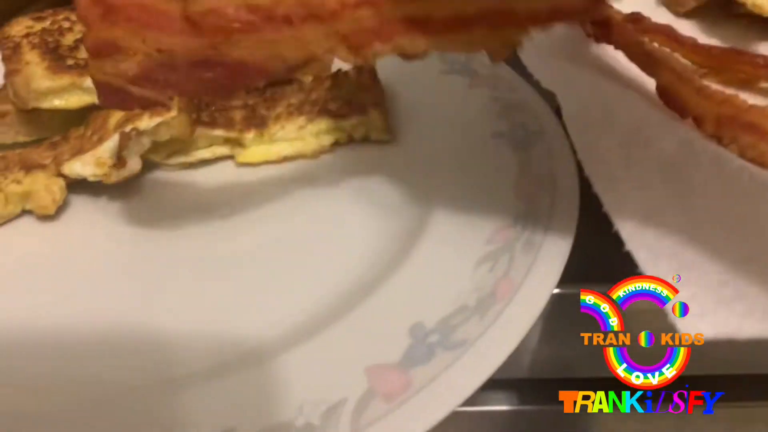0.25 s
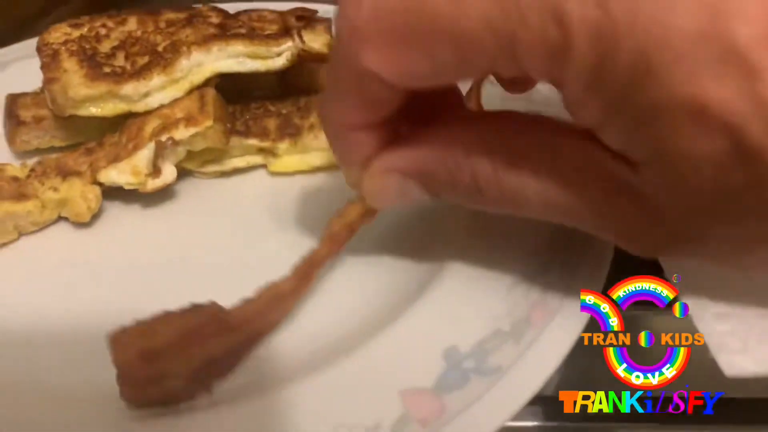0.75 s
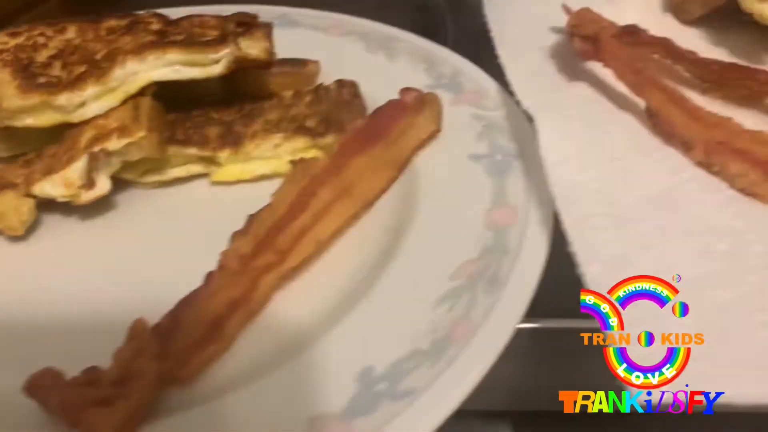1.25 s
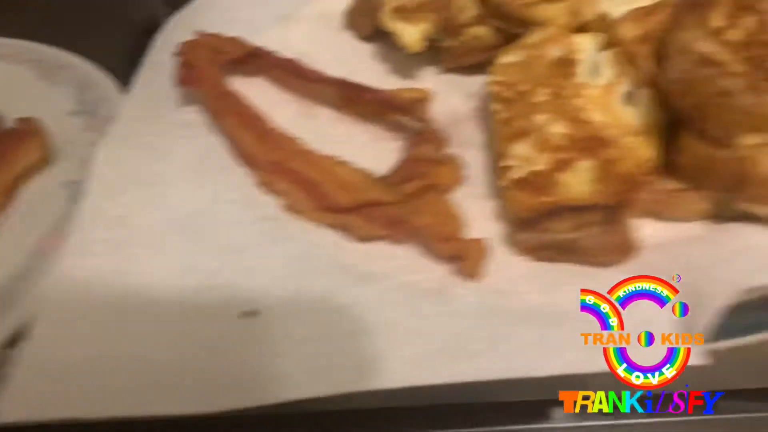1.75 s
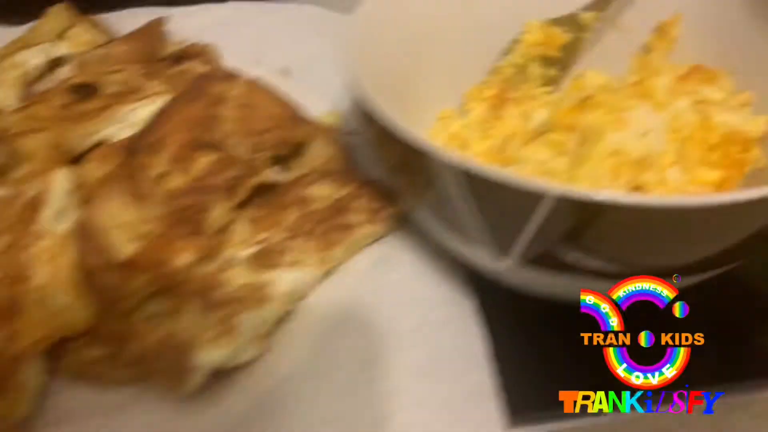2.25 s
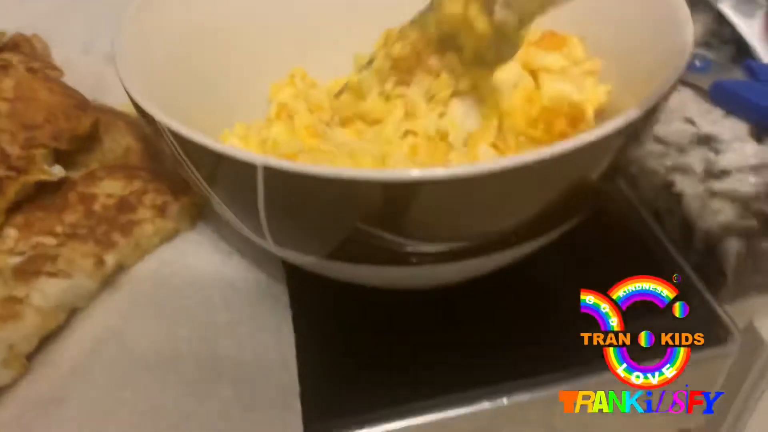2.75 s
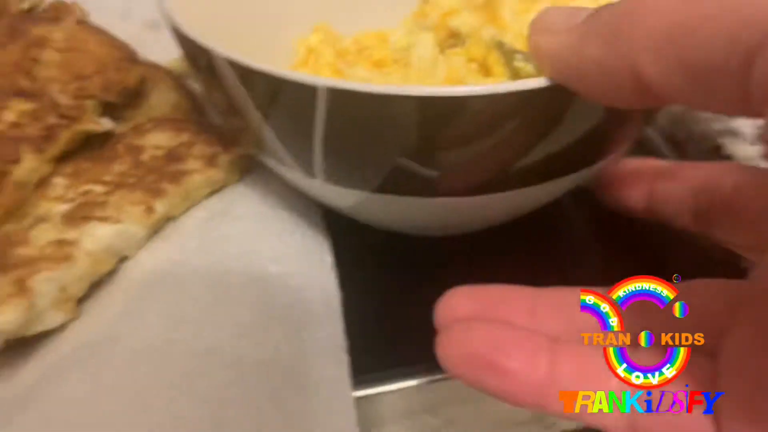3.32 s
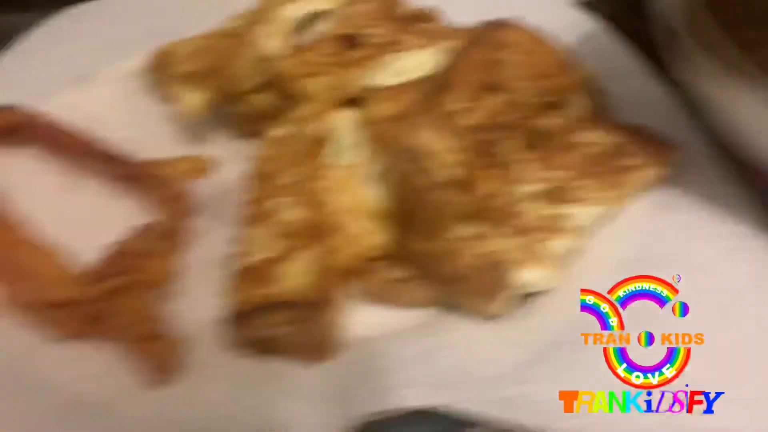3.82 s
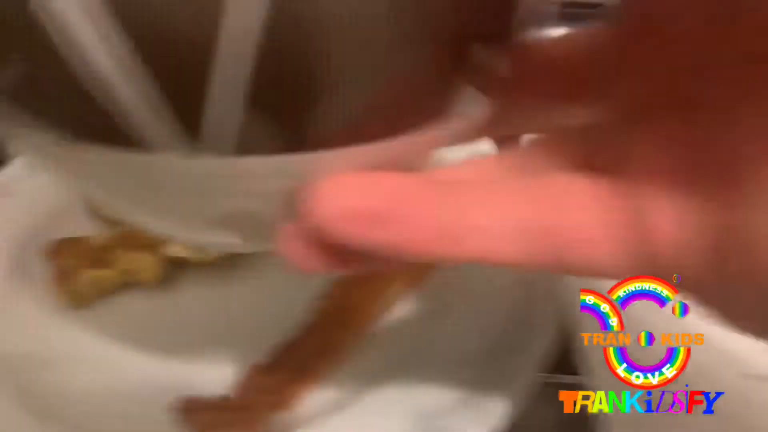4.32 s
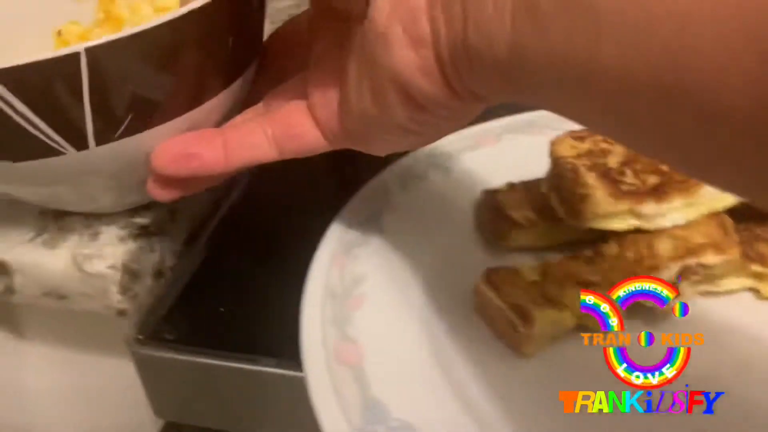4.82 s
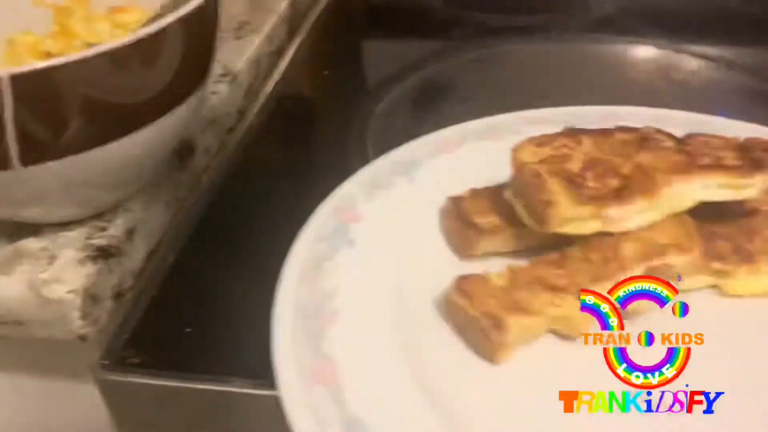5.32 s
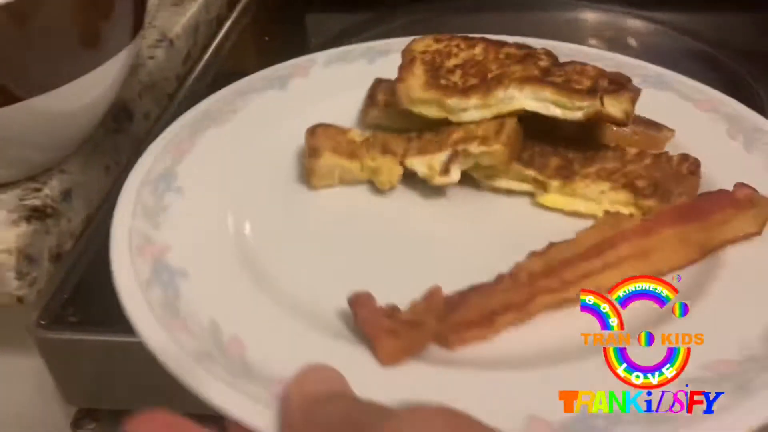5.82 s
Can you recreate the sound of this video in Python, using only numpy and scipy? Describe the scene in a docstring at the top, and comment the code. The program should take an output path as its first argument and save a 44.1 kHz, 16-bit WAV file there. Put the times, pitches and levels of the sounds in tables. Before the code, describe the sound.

Food is plated in a small home kitchen, heard from close by over a faint appliance hum. Small crisp snaps and soft taps come first, then a few bright clinks of a spoon in a ceramic bowl, with quiet rustles between them. Near the end the bowl lands on a stone counter with a booming double knock, and a plate knocks and scrapes briefly across the stove top.

```python
"""A small kitchen, close up, as food is plated. Crisp food snaps, rustles and ticks on a plate, and a
spoon clinks in a ceramic bowl, ringing its modes. The bowl is set down on a stone counter, which booms;
then the plate is dragged over the stove top, grit scraping under its foot. An appliance hums over the
low murmur of the room, and the walls answer each blow."""
import sys
import numpy as np
from scipy import signal
from scipy.fft import rfft, irfft, next_fast_len
from scipy.io import wavfile
from scipy.ndimage import uniform_filter1d, map_coordinates

SR = 44100
rng = np.random.default_rng(int(sys.argv[2]) if len(sys.argv) > 2 else 0)


def dump(signal):
    """Clip the signal to [-1, 1] and save it as 16-bit WAV at the path in sys.argv[1]."""
    limited = np.clip(np.atleast_2d(signal).T, -1, 1)
    pcm = np.round(limited * 32767).astype(np.int16)
    wavfile.write(sys.argv[1], SR, pcm)


N = 267687

# the drag of the plate: t/s, scrape/dB, hiss/dB
DRAG_LEVELS = [(5.43, -85, -87), (5.486, -47.5, -52), (5.52, -33, -33), (5.6, -36.5, -42),
               (5.675, -36.5, -39), (5.724, -26, -35), (5.83, -26.5, -37.5), (5.88, -27, -35),
               (5.95, -43, -42.5), (6.07, -45, -60)]
# spectrum of the grit under its foot: f/Hz, level/dB
GRIT_SPECTRUM = [(47, -51), (80, -58), (289, 8), (1630, -9.5), (1860, -0.5), (2080, -6), (4420, -8),
                 (4940, -19), (13700, -40.5), (14600, -50), (16000, -99.5)]


def amp(db):
    return 10 ** (np.asarray(db) / 20)


def unit(x):
    return x / np.sqrt(np.mean(x ** 2) + 1e-20)


def along(points, hz):
    """Read (f/Hz, value) points on a log frequency axis."""
    f, v = np.transpose(points)
    return np.interp(np.log(hz + 1), np.log(f + 1), v)


def faders(rows):
    """A dB curve for each column after the time; silent before the first row."""
    times, *columns = np.vstack(rows).T
    return [np.interp(np.arange(N) / SR, times, db, left=-150) for db in columns]


def wobble(rate):
    """A smooth random curve, rate knots a second."""
    return map_coordinates(rng.standard_normal(int(N * rate / SR) + 4), [np.arange(N) * rate / SR])


def filtered(x, response):
    """Shape x by a complex function of frequency."""
    size = next_fast_len(x.shape[-1] + 8192)
    return irfft(rfft(x, size) * response(np.fft.rfftfreq(size, 1 / SR)), size)[..., :x.shape[-1]]


def add(out, s, sound, pan_db=0):
    """Mix a sound in at s seconds; positive pan is left."""
    part = out[:, round(s * SR):][:, :len(sound)]
    part += sound[:part.shape[1]] * amp([[pan_db / 2], [-pan_db / 2]])


def ring(modes, damping, hold_s=0):
    """Struck modes, each at a new strength; further contact slows their decay for hold_s."""
    t = np.arange(SR // 4) / SR
    hz, db, t60 = np.transpose(modes)[:, :, None]
    age = t - .45 * np.minimum(t, hold_s)
    level = db + 1.5 * rng.standard_normal(db.shape) - 60 * damping * age / t60
    window = (1 - np.exp(-t / 0.00072)) * np.cos(2 * np.pi * t) ** .5
    return (amp(level) * np.sin(2 * np.pi * hz * t)).sum(0) * window


def grainy(rate, spread_db, share, patchy_db, size=N):
    """Stereo noise with spikes on it, in patches of random gain."""
    spikes = (rng.random(size) < rate / SR) * rng.standard_normal(size)
    spikes *= amp(spread_db * rng.exponential(size=size))
    grains = np.sqrt(share) * unit(spikes) + np.sqrt(1 - share) * rng.standard_normal((2, size))
    spectra = signal.stft(grains, nperseg=256)[2]
    patches = uniform_filter1d(rng.standard_normal(spectra.shape[1:]), size=7, axis=0)
    patches = uniform_filter1d(patches, size=9, axis=1)
    return signal.istft(spectra * amp(patchy_db * unit(patches)), nperseg=256)[1][:, :size]


def room_air():
    """Stereo noise bed, heavy in the bass, whose width changes with pitch."""
    # spectrum of the room: f/Hz, level/dB
    spectrum = [(12, -65.5), (20, -35.5), (43, -6), (65, -4.5), (77, -20.5), (91, -37), (124, -24),
                (151, -28), (230, -22.5), (273, -27.5), (314, -23), (351, -29), (913, -40.5), (1180, -56.5),
                (16500, -57)]
    # how alike left and right are: f/Hz, correlation
    likeness = [(60, 0.33), (130, 0.9), (290, 0.47), (640, -0.18), (1410, 0.52), (3100, -0.18),
                (6820, -0.64), (15000, 0.9)]
    angle = lambda hz: np.arccos(along(likeness, hz)) / 2
    noise = rng.standard_normal((2, N))
    mid, side = filtered(noise, lambda hz: np.array([np.cos(angle(hz)), np.sin(angle(hz))]))
    return filtered(np.array([mid + side, mid - side]), lambda hz: amp(along(spectrum, hz)))


def hum_and_murmur():
    """An appliance hum wavers near mains pitch over the room's murmur and faint hiss."""
    # background levels: t/s, hum/dB, murmur/dB
    bed_levels = [(0.0, -61, -73.5), (0.93, -61, -67), (1.55, -60, -73), (2.1, -58.5, -58), (2.5, -60, -65),
                  (3.2, -61, -58), (3.7, -62.5, -64.5), (4.55, -59, -63), (5.1, -56.5, -64),
                  (6.07, -52.5, -68.5)]
    hum_db, murmur_db = faders(bed_levels)
    air = room_air()
    bass = lambda hz: 1 / (1 + (hz / 85) ** 8)
    rumble = unit(filtered(air, bass))
    murmur = unit(filtered(air, lambda hz: (1 - bass(hz)) * (hz < 1200)))
    hiss = unit(filtered(air, lambda hz: (hz >= 1200) * (hz < 15200)))
    mains = np.sin(2 * np.pi * np.cumsum(59 + 0.88 * wobble(2.5)) / SR)
    shake = amp(faders(DRAG_LEVELS)[0] - 12)  # the dragged plate shakes the stove top
    murmur *= (amp(murmur_db) + shake) * amp(0.51 * wobble(6.5))
    return amp(hum_db) * (0.64 * rumble + 0.78 * mains) + murmur + amp(-84.5) * hiss


def walls(x):
    """The room's short answer; the treble dies first."""
    # reverb decay: f/Hz, t60/s
    decay = [(100, .5), (500, .4), (2000, .33), (6000, .2), (14000, .12)]
    hz, t, spectra = signal.stft(rng.standard_normal((2, SR // 2)), SR, nperseg=256)
    tail = signal.istft(spectra * amp(-60 * t / along(decay, hz)[:, None]), SR, nperseg=256)[1]
    delayed = np.pad(x, (130, 0))[None]
    return signal.fftconvolve(delayed, tail / np.linalg.norm(tail[0]), axes=1)[:, :N]


def rustle():
    """Dull and bright rustle of handling, swelling into the noisy tails of the loud clinks and knocks."""
    # rustle and tails of the hits: t/s, dull/dB, bright/dB
    levels = [(0.5, -95, -88), (0.63, -107, -89.5), (0.7, -88, -67), (0.76, -75, -80), (0.89, -77.5, -70.5),
              (0.97, -84, -80.5), (1.05, -77, -66), (1.15, -71, -87), (1.3, -105, -99), (1.66, -81.5, -104),
              (1.75, -49.5, -44), (1.91, -69.5, -75.5), (2.12, -65.5, -76), (2.24, -62.5, -69.5),
              (2.36, -65, -60.5), (2.5, -79, -82.5), (2.63, -80, -80.5), (2.76, -59.5, -58.5),
              (3.08, -66.5, -71), (3.3, -68, -79), (3.68, -71.5, -81.5), (3.75, -70, -69), (3.93, -74, -73),
              (4.0, -75.5, -79), (4.5, -71, -77), (4.7, -62, -57.5), (4.95, -54.5, -68), (5.1, -68.5, -67),
              (5.45, -83, -85)]
    # colours of the two textures: f/Hz, level/dB
    dull_eq = [(400, -30), (900, -1.5), (2000, 0), (4000, -5), (7000, -23.5), (16000, -47.5)]
    bright_eq = [(2500, -44.5), (5000, -5), (8000, -4), (12000, -6), (15500, -11.5), (17000, -31.5)]
    dull_db, bright_db = faders(levels)
    dull = grainy(330, spread_db=-0.5, share=0.095, patchy_db=3.5)
    dull = unit(filtered(dull, lambda hz: amp(along(dull_eq, hz))))
    bright = grainy(770, spread_db=1.0, share=0.075, patchy_db=3.0)
    bright = unit(filtered(bright, lambda hz: amp(along(bright_eq, hz))))
    return amp(dull_db + 2.2 * wobble(15)) * dull + amp(bright_db + 3.0 * wobble(29)) * bright


def food_snaps():
    """Crisp crust and wet egg snap: a few pitched cycles on a broad tick."""
    # snaps: t/s, level/dB, f/Hz
    snaps = [(0.5387, -33, 8700), (0.5618, -45, 3130), (0.599, -52, 8340), (0.6814, -50, 13100),
             (0.7786, -54, 11900), (0.8129, -43, 12600), (0.8902, -52, 9400), (0.9074, -56, 4400),
             (1.0224, -54, 9600), (1.046, -44, 13200), (1.0572, -49.5, 4770), (1.0833, -45.5, 9900),
             (1.1513, -53.5, 10100), (2.1729, -47.5, 3830), (2.2146, -43.5, 7750), (2.3236, -40.5, 12300),
             (2.338, -35, 10800), (2.3494, -40, 11400), (2.3672, -43, 2980), (2.3853, -30, 9200),
             (2.396, -42, 10300), (2.6694, -56, 3420), (2.7157, -38.5, 12400), (2.7382, -36, 7700),
             (2.7628, -37.5, 9900), (2.7702, -32.5, 7600), (2.7754, -35, 8600), (2.855, -47, 10060),
             (2.894, -35, 14400), (2.9378, -48, 3900), (2.9643, -47.5, 9920), (3.03, -45, 7580),
             (3.0579, -41, 3670), (3.2879, -44.5, 5007)]
    rise_cycles, decay_cycles = .5, 5.1
    out, t = np.zeros((2, N)), np.arange(400) / SR
    for s, db, hz in snaps:
        envelope = np.exp(-t * hz / decay_cycles) * (1 - np.exp(-t * hz / rise_cycles))
        pip = np.sin(2 * np.pi * hz * t) * envelope
        tick = .2 * hz / 10000 * np.diff(rng.standard_normal(401)) * np.exp(-t / 0.0043)
        add(out, s, amp(db) * (pip + tick), pan_db=7.5 + 7 * rng.standard_normal())
    return out


def plate_colour(f):
    """The plate's resonances on a flat bed, each weighed against the grit's spectrum."""
    # plate modes: f/Hz, width/Hz, level/dB
    plate_modes = [(283, 120, 1), (873, 170, 6), (1310, 250, -6.5), (1832, 98, 4), (2370, 10.7, -33),
                   (2510, 33, -1), (2782, 33, -2.5), (3165, 50, 1.5), (3930, 17, -10), (4390, 200, -3.5),
                   (4480, 130, -9.5), (5230, 26, -9.5), (6500, 26, -13.5), (7980, 46, -14.5),
                   (8270, 31, -13), (9130, 29, -21.5), (9920, 47, -16), (11020, 62, -23),
                   (11900, 40.7, -21), (13630, 82, -23), (14150, 23, -29.5), (14500, 28, -34)]
    peaks = 0
    for k, (hz, width, db) in enumerate(plate_modes):
        resonance = 1j * f * width / (hz * hz - f * f + 1j * f * width)
        peaks += (-1) ** k * amp(db - along(GRIT_SPECTRUM, hz)) * resonance
    return .55 + 1.3 * peaks


def plate_taps():
    """Food lands on the plate and rings its free rim."""
    # landings: t/s, level/dB, damping factor
    landings = [(0.5402, -54, 1.96), (0.8114, -79.5, 0.32), (1.048, -53, 1.38), (1.1514, -63.5, 2.1)]
    # rim modes: f/Hz, level/dB, t60/s at damping 1
    rim_modes = [(1237, 1.5, 0.2), (1959, -8, 0.58), (2066, -0.5, 0.43), (2895, -4, 0.47),
                 (3570, -11, 0.23), (4270, -21.5, 0.8), (6260, -13, 0.14)]
    out = np.zeros((2, N))
    for s, db, damping in landings:
        add(out, s, amp(db) * ring(rim_modes, damping))
    return out


def plate_drag():
    """Grit under the dragged foot shakes the plate's modes: rumble, scrape and hiss."""
    grit = grainy(600, spread_db=2, share=0.3, patchy_db=1.5, size=SR)
    grit = filtered(grit, lambda hz: amp(along(GRIT_SPECTRUM, hz)) * plate_colour(hz))
    out = np.zeros((2, N))
    scrape_db, hiss_db = faders(DRAG_LEVELS)
    rumble_db = scrape_db - 0.5
    for k, db in enumerate([rumble_db, scrape_db, hiss_db]):
        crossover = [(700, k == 0), (1900, k == 1), (4300, k == 1), (6500, k == 2)]
        band = filtered(grit, lambda hz: along(crossover, hz))
        out[:, -SR:] += amp(db + 1.2 * wobble(70))[-SR:] * unit(band)  # the foot catches and slips
    return out


def spoon_clinks():
    """A spoon strikes the bowl, cracks and chatters; where it lands tilts the strength of the modes."""
    # clinks: t/s, level/dB, tilt/dB near 1, 2.8, 7.7 and 11 kHz, damping factor, pan/dB
    clinks = [(1.5801, -47, -14.5, -18, -5.5, -34, 1.2, 8.2),
              (1.7255, -14.5, -27.5, -20, -27, -7.5, 1.4, 11),
              (1.8612, -45.5, -6.5, -8.5, -8, -9, 0.7, 7.5), (1.8914, -49.5, -16, -10, -2.5, -6.5, 3.1, 23),
              (1.9871, -53, -4, 2.5, -8.5, -7.5, 0.87, 11.7), (2.0176, -52.5, -4, -11, -13, -24, 1.5, 9.6),
              (3.1264, -17.5, -25, -12.5, -6.5, -5.5, 1.03, 13),
              (3.23, -55.5, -13, 2.5, -11, -6, 0.98, 15.5), (3.6298, -84, 17.5, 13, -13, -6, 0.95, 14),
              (3.71, -43, -7.5, 11.5, -3, -12.5, 4.1, 11.6), (4.1386, -70, -1, -3, -11, -14, 1.4, 5.3),
              (4.1636, -68.5, 5, -0.5, -11, -20, 3.4, 14), (4.2613, -49, -9, 12.5, -7, -16.5, 2.4, 2),
              (4.6339, -52.5, -6, 9.5, -7, -29, 2, 7.1), (4.7315, -24.5, -13, -0.5, -17.5, -18.5, 1.7, 5.9),
              (4.936, -16.5, -15.5, -3, -10.5, -9, 4.7, 11.5), (5.0444, -52.5, -14, 3, -19, -10.5, 2, 10)]
    # ceramic modes: f/Hz, level/dB, t60/s at damping 1
    bowl_modes = [(1062, -3, .3), (1092, -3, .3), (1850, -6, .05), (2775, -15, .25), (2860, 0, .075),
                  (3390, -11, .08), (4996, -19, .3), (5034, -15, .35), (5044, 0, .07), (7715, 0, .1),
                  (9450, -26, .08), (10815, 0, .12), (11390, -15, .2), (12115, -17, .17), (13180, -21, .12),
                  (14245, 0, .09), (15500, -11, .06)]
    chatter_s, crack_t60, crack_hz = .018, .018, 7100
    out, t = np.zeros((2, N)), np.arange(3000) / SR
    hz, db, t60 = np.transpose(bowl_modes)
    for s, level_db, low, mid, high, top, damping, pan_db in clinks:
        tilt = [(1075, low), (2800, mid), (5040, 0.0089), (7715, high), (11000, top), (14245, top - 11.5)]
        contact = .034 * rng.standard_normal(len(t)) * np.exp(-(t / chatter_s) ** 4)
        contact[0] = 1  # the blow itself, ahead of the chatter
        ceramic = ring(np.transpose([hz, db + along(tilt, hz), t60]), damping, chatter_s)
        add(out, s, amp(level_db) * signal.fftconvolve(ceramic, contact), pan_db)
        crack = filtered(rng.standard_normal(len(t)), lambda f: 1 / (1 + (crack_hz / (f + 1)) ** 8))
        add(out, s, amp(level_db + top + 2 - 60 * t / crack_t60) * crack, pan_db)
    return out


def slab_sweep(t):
    """A blow on the stone slab arrives as a falling sweep: pitch = cycles / age."""
    cycles, length_s = 4, 0.015
    age = t + 1 / 2000
    envelope = np.sqrt(length_s / age) * np.exp(-(age / length_s) ** 2)
    return np.sin(2 * np.pi * cycles * np.log(age)) * envelope


def dish_knocks():
    """Dishes knock on hard tops in noise bursts that die band by band; returns counter and plate."""
    # knocks: t/s, level/dB, strongest f/Hz, fall below and above it/(dB per octave), counter boom/dB
    blows = [(0.538, -55.5, 1500, 6.5, 2.6, -79), (0.565, -65, 1200, 2, 2.5, -75),
             (0.599, -68, 2000, 4, 4.3, -75), (1.045, -52, 896, 10.5, 6.4, -73),
             (1.462, -58.5, 171, 8.5, 14.4, -53.5), (1.577, -70, 1780, 3.5, 4.6, -61.5),
             (1.725, -37.5, 480, 3.5, 0.55, -60.5), (1.739, -43.5, 404, 1, 4.5, -48.5),
             (1.889, -62.5, 2800, 4, 7.1, -57.5), (1.99, -60, 2190, 8, 13, -58),
             (3.127, -33, 2500, 1, 4.5, -50.5), (3.386, -57, 170, 6, 20, -51.5),
             (3.709, -58.5, 1910, 17, 7, -57), (3.931, -62.5, 170, 5, 8, -48.5),
             (4.261, -64, 1900, 6, 9, -65.5), (4.631, -66.5, 4000, 2, 6, -50),
             (4.7004, -13, 864, 9, 7.9, -29), (4.925, -22.5, 1210, 8.5, 8.5, -39.5),
             (4.939, -32, 450, 16, 4, -45.5), (5.48, -41.5, 1090, 7, 5.5, -49.5),
             (5.516, -15.5, 840, 10.5, 6.85, -61), (5.902, -19, 4067, 3, 5.3, -61)]
    # bands of the contact noise: f/Hz, t60/s
    band_decay = [(170, 0.17), (450, 0.096), (1300, 0.084), (3000, 0.15), (6500, 0.017), (12500, 0.086)]
    # counter modes, before each knock's offsets: f/Hz, level/dB, t60/s
    counter_modes = [(94, -2.5, 0.45), (584, 3, 0.096)]
    contact_s, crack_db, crack_cycles = 0.0046, 7, 3.7
    lag_cycles = 1.6  # each band trails the touch: bending waves carry the treble faster
    counter, plate, t = np.zeros((2, N)), np.zeros((2, N)), np.arange(SR // 5) / SR
    centres, t60s = np.transpose(band_decay)[:, :, None]
    crossovers = [np.transpose([centres[:, 0], row]) for row in np.eye(len(centres))]
    split = lambda hz: np.array([along(points, hz) for points in crossovers]) * (hz > 105)
    onset = t < contact_s + 1 / centres
    cycles = np.maximum(t * centres - lag_cycles, 0)
    decay_db = -60 * np.maximum(t - contact_s - lag_cycles / centres, 0) / t60s
    envelope = np.minimum(cycles, 1) * amp(decay_db + crack_db * np.exp(-(cycles / crack_cycles) ** 2))
    for s, db, peak_hz, below_db, above_db, boom_db in blows:
        octaves = np.log2(centres / peak_hz)
        band_db = db - np.where(octaves > 0, above_db, -below_db) * octaves
        burst, out = rng.standard_normal(len(t)), counter
        if 4.69 < s < 4.93:  # the bowl's foot meets the slab
            burst += 0.47 * slab_sweep(t)
        if not 1.3 < s < 5.4:  # before and after the bowl is handled, the plate takes the knock
            burst, out = filtered(burst, plate_colour), plate
        bands = filtered(burst, split)
        bands /= np.sqrt((bands ** 2 * onset).sum(1) / onset.sum(1))[:, None]
        add(out, s, (bands * amp(band_db) * envelope).sum(0))
        offsets = [[0, boom_db, 0], [0, band_db[1, 0] + 4, 0.0029]]  # upper mode follows the 450 Hz band
        add(counter, s, ring(np.add(counter_modes, offsets), damping=1))
    return counter, plate


def scene():
    """Dishes and food reach the left channel later, except in the top treble; the room surrounds them."""
    counter, plate_knocks = dish_knocks()
    close = spoon_clinks() + plate_knocks + plate_drag() + plate_taps() + food_snaps() + rustle()
    lag_s, sides = 0.0004657, np.array([[1], [-1]])
    placed = filtered(close, lambda hz: np.exp(-1j * np.pi * np.minimum(hz * lag_s, 4) * sides))
    return placed + counter + amp(-13.5) * walls((close + counter).mean(0)) + hum_and_murmur()


def record(dry):
    """The microphones narrow the image in the bass and high treble and cut off the very top."""
    # stereo width: f/Hz, side gain/dB
    width = [(100, -7), (600, -1.5), (6000, 1), (8500, -2), (11000, -8.5), (15000, -27.5)]
    mid, side = dry.mean(0), (dry[0] - dry[1]) / 2
    side = filtered(side, lambda hz: amp(along(width, hz)))
    band_limit = lambda hz: 1 / (1 + (hz / 15600) ** 30) * (hz < 16650)
    return filtered(np.array([mid + side, mid - side]), band_limit)


dry = scene()
out = record(dry)
dump(out)
```